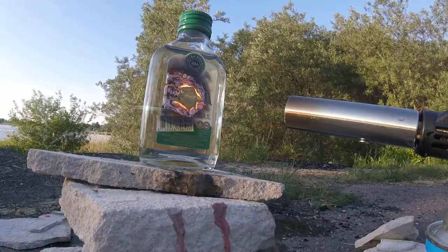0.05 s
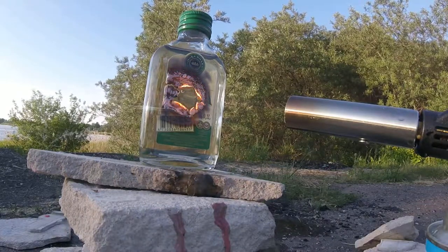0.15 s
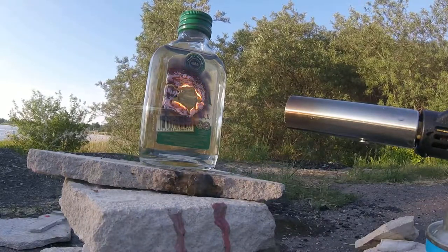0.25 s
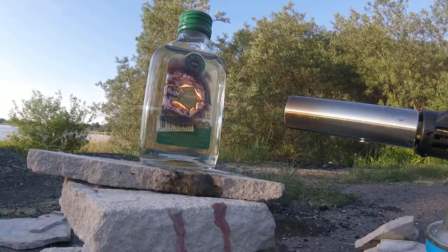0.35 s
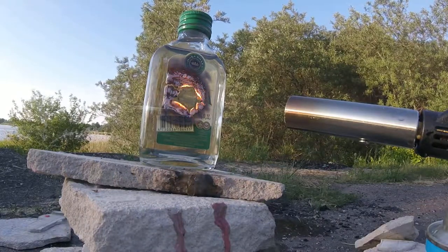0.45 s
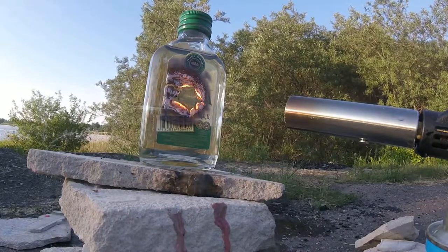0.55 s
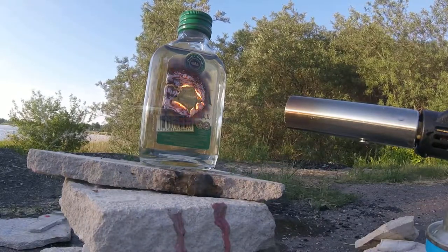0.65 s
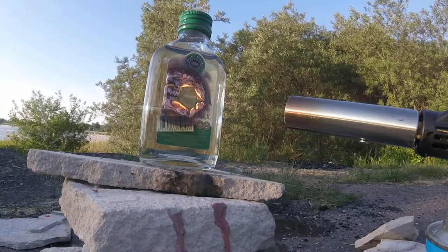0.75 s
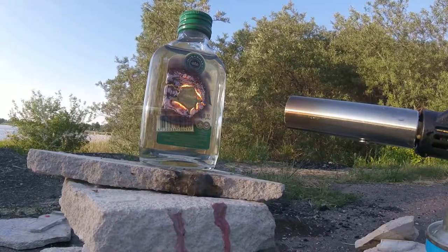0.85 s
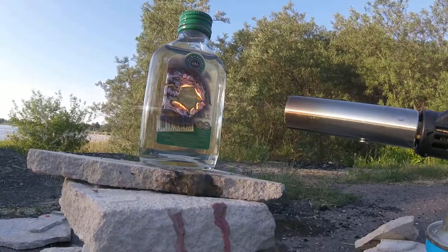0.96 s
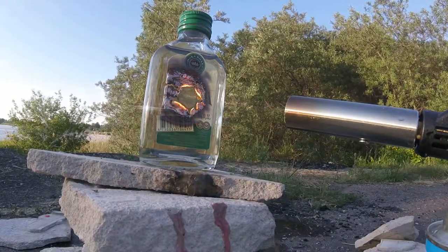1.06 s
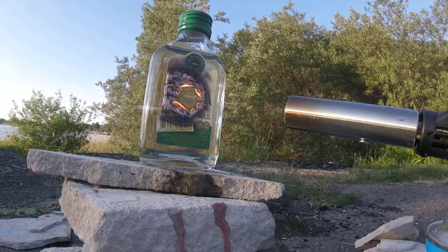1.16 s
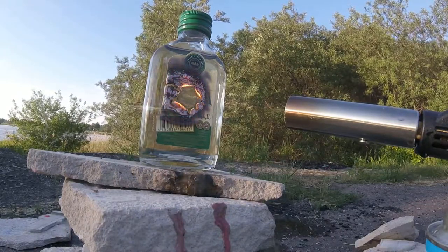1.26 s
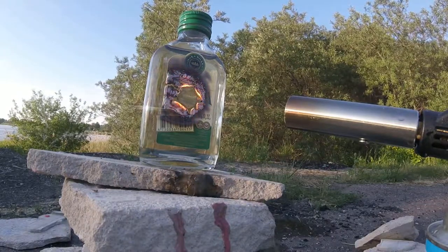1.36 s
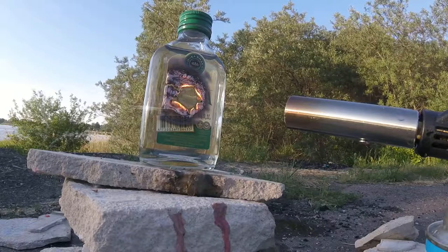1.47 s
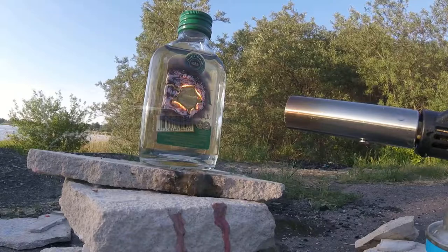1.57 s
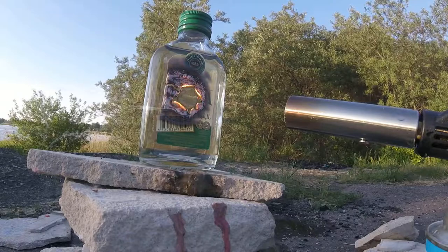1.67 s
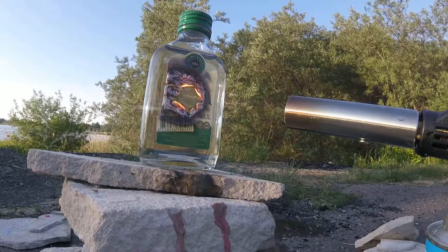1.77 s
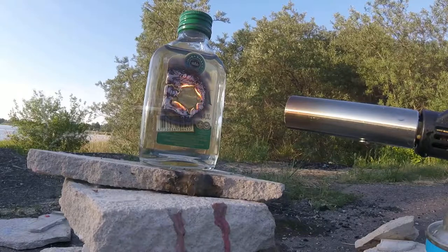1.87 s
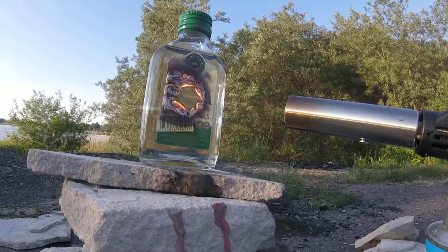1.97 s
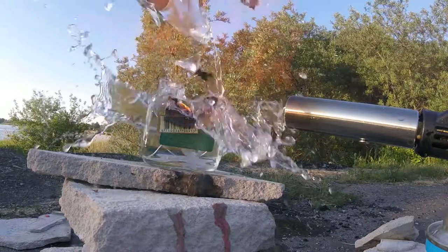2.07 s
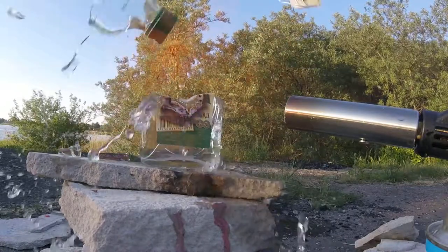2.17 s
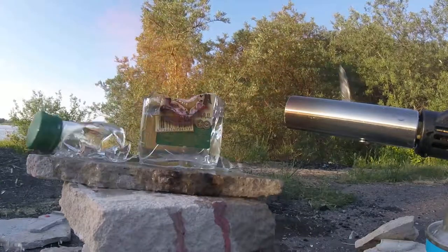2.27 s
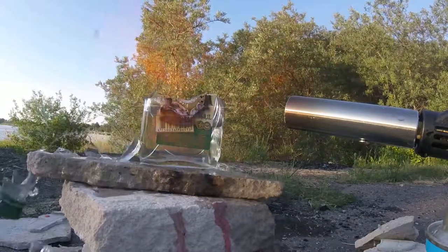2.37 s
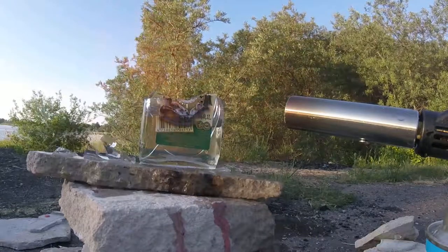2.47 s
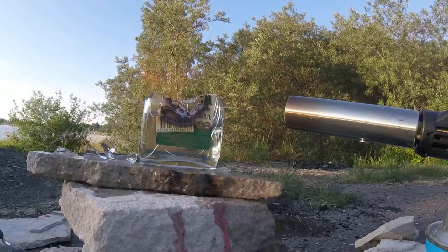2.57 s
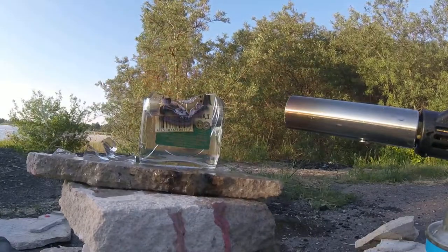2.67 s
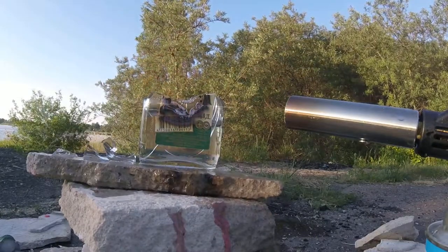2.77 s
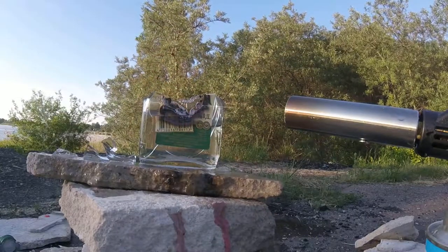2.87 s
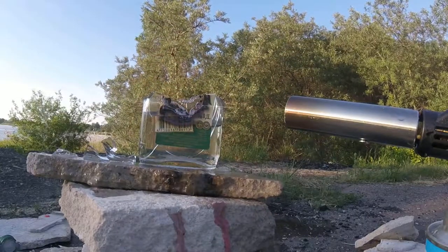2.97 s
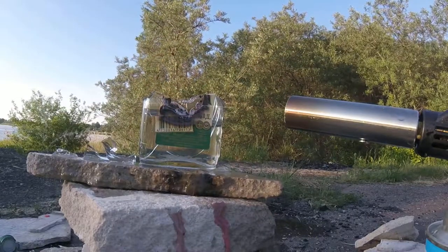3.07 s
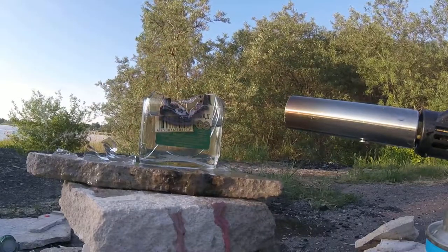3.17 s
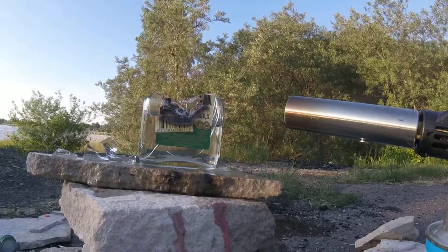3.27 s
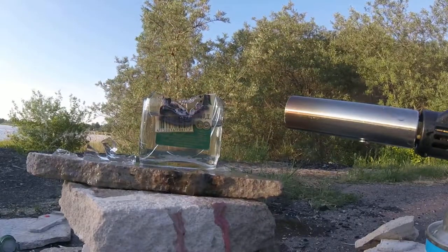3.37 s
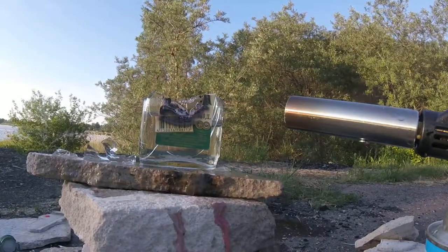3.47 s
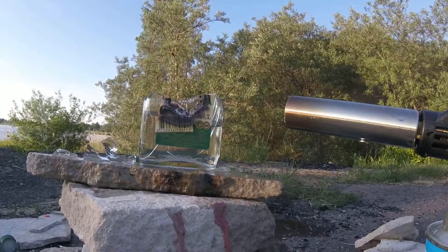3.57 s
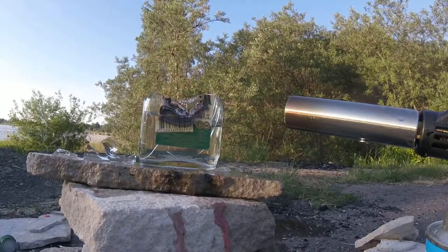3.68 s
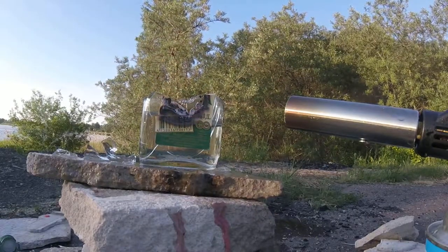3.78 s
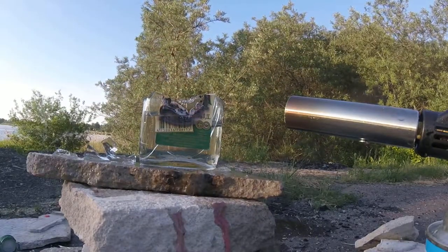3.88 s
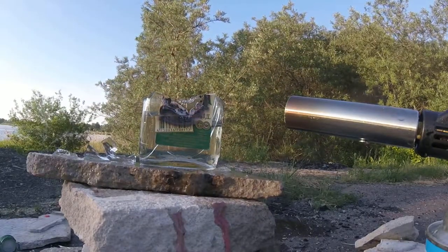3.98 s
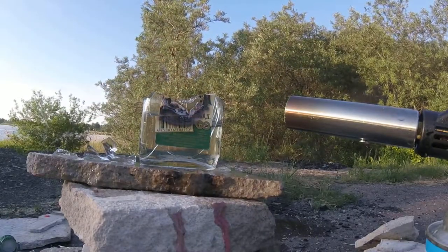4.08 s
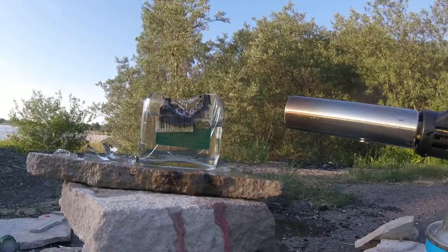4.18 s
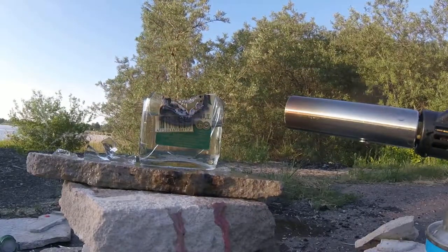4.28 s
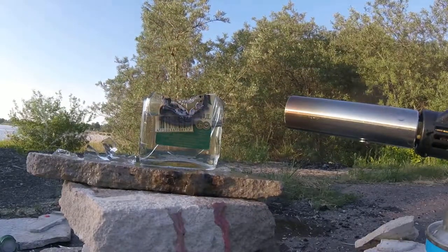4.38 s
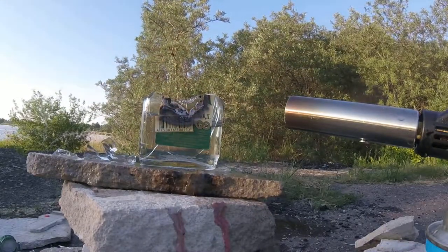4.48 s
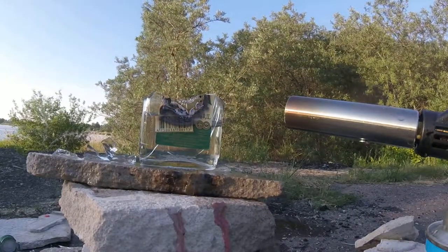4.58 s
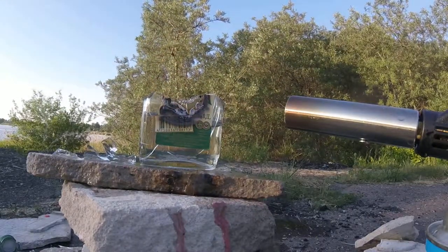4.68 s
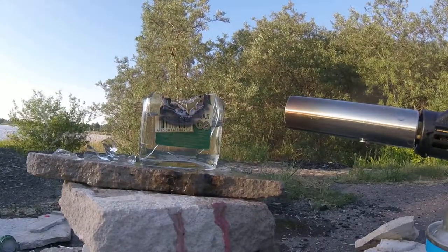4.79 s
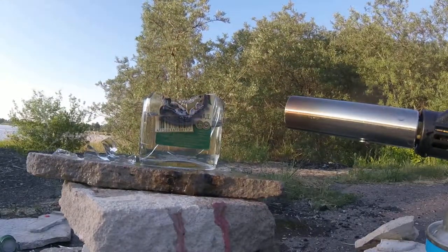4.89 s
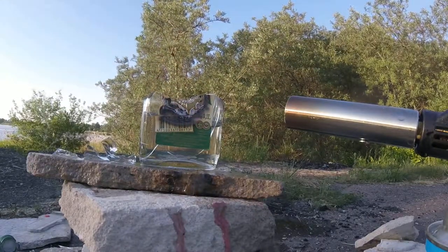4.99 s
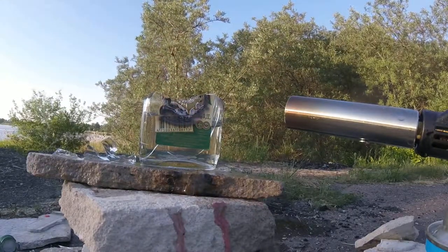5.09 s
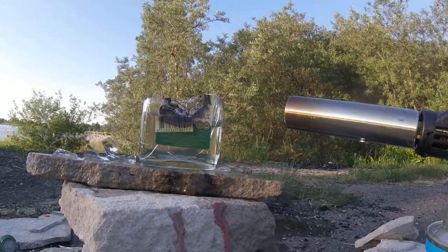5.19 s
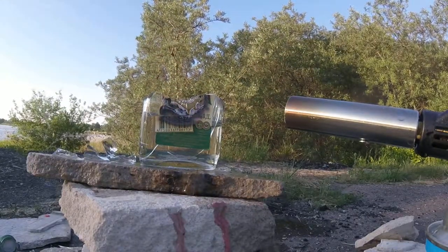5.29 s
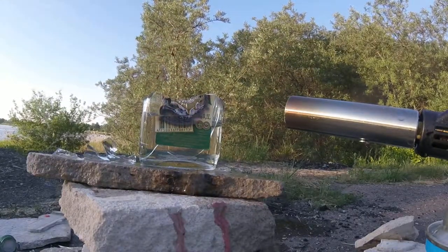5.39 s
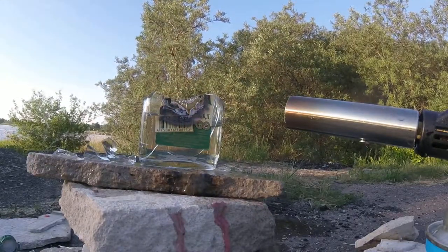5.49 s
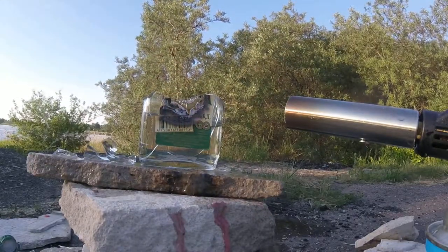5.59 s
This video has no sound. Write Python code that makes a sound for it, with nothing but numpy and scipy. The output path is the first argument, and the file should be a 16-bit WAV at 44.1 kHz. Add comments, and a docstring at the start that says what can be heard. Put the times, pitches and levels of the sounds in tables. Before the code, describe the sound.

Loud, rough torch blast on glass, a split-second hush, a loud pop, clinking falling glass, then soft flame puffs over steady hiss.

```python
"""A gas torch roars against a glass bottle on a stone slab outdoors: turbulent noise shaped in frequency,
with jet hiss coloured by burner tube and bottle. The sound drops abruptly, the bottle bursts as an N-shaped
pressure wave, and its shards ring as damped modes while crumbs, drips and splinters tick on the stone.
The freed flame flutters in puffs of low noise under the hiss of the nozzle."""
import sys
import numpy as np
from scipy import signal
from scipy.fft import rfft, irfft, next_fast_len
from scipy.io import wavfile
from scipy.ndimage import uniform_filter1d, map_coordinates

SR = 44100
rng = np.random.default_rng(int(sys.argv[2]) if len(sys.argv) > 2 else 0)


def store_wav(level_fs):
    """Save 16-bit WAV to argv[1]."""
    pcm = np.round(np.clip(np.atleast_2d(level_fs), -1, 1) * 32767)
    wavfile.write(sys.argv[1], SR, pcm.T.astype(np.int16))


def ratio(d):
    """dB to gain"""
    e = np.asarray(d, float) / 20
    return 10 ** e


N = 248722  # length [samples]
DROP_S = 2.0225  # the whole sound drops abruptly here

# Spectrum of the roar on the glass: (frequency [Hz], relative density [dB per Hz])
ROAR = [(70, -12), (120, -6), (270, 0.5), (450, -1), (1260, -3.5), (1890, -12), (2480, -24.5),
        (3200, -22.5), (4210, -22.5), (6010, -20.5), (8000, -22.5), (11000, -30), (13000, -56)]
# Spectrum of the freed flame's puffs: (frequency [Hz], relative density [dB per Hz])
PUFF = [(150, 2), (300, 0), (700, -7.5), (1500, -15), (3000, -22.5), (5000, -28), (8000, -99)]
# Spectrum of the low flutter: (frequency [Hz], relative density [dB per Hz])
RUMBLE = [(12, -39.5), (20, -3), (59, -2.5), (147, -4.5), (195, -11), (299, -14), (600, -41.5), (780, -58),
          (1320, -120)]
# Harsh upper part of the roar: (frequency [Hz], relative density [dB per Hz])
RASP = [(1000, -12), (1600, -2.5), (2500, 1.5), (3300, -8.5), (4500, -25), (7000, -40)]
# Spectrum of the jet hiss ahead of the tube: (frequency [Hz], relative density [dB per Hz])
HISS = [(300, -38), (800, -10), (1500, -14.5), (3500, -16), (3950, -11), (4350, -1), (6300, -5.5),
        (6900, -4), (7500, -8.5), (9500, -20.5), (12000, -15.5), (14300, 0)]
# Burner tube resonances on the hiss: (frequency [Hz], width [Hz], peak gain added to unity [dB])
TUBE = [(2320, 360, 15.5), (5020, 790, 7), (5960, 230, 4), (9260, 1410, 27), (10900, 400, 13),
        (13060, 380, 20)]
# The whole bottle reflects the hiss and colours it: (frequency [Hz], gain [dB])
BOTTLE = [(300, -16), (3600, 18), (4450, -3.5), (5250, 5.5), (5700, 4.5), (6300, -6), (8000, 1.5),
          (12000, -5), (14300, -7)]

# Flame on the glass when calm: (roar level [dB], low flutter level [dB], hiss level [dB])
CALM = (-29, -37.5, -41.5)
# After the whole sound drops, until the burst: (roar level [dB], low flutter level [dB], hiss level [dB])
DROPPED = (-47.5, -63, -59.5)
# The flame catches the glass harder: (start [s], length [s], roar above calm [dB])
SURGES = [(-.05, .236, 7.5), (.3, .04, 6), (.5, .055, 5), (.6, .06, 2.5), (.668, .018, 6), (.83, .04, 5.5),
          (.876, .018, 6), (1.048, .425, 8), (1.5, .09, 2.5), (1.635, .035, 8), (1.7, .09, 8),
          (1.81, .08, 8.5), (1.92, .07, 9), (2.008, .03, 5)]
SURGE_EDGE_S = .012
FLUTTER_FOLLOWS, HISS_FOLLOWS, RASP_GROWS = 0.085, 0.12, 1.24  # dB of each per dB of roar
# Freed flame between puffs: (time [s], roar level [dB], low flutter level [dB], hiss level [dB])
FREED = [(2.085, -38, -37, -50), (2.2, -51, -41, -49.5), (2.4, -44.5, -36.5, -50.5),
         (2.9, -49, -39.5, -48.5), (3.3, -53, -42.5, -47.5), (3.55, -59, -46.5, -47.5),
         (3.79, -58.5, -48, -45), (3.87, -50.5, -42.5, -44), (4.25, -56, -43, -44), (4.7, -52, -38, -42.5),
         (5.2, -54.5, -42.5, -42.5), (5.5, -54, -40.5, -42), (5.64, -49, -40, -44)]
# Puffs as the freed flame flaps: (middle [s], length [s], roar level [dB], low flutter level [dB])
PUFFS = [(2.134, 0.097, -39.5, -28.5), (2.269, 0.045, -47, -32.5), (2.332, 0.17, -42, -36),
         (2.419, 0.052, -49, -29.5), (2.848, .1, -54, -37), (3.05, 0.065, -46, -33.5),
         (3.273, 0.039, -53, -33), (3.361, 0.039, -51, -37), (3.642, 0.14, -54, -42),
         (3.83, 0.064, -48.5, -33), (4.11, .05, -46, -34), (4.4, .07, -47, -34), (4.527, 0.11, -49, -36.5),
         (4.636, 0.037, -42, -37), (4.684, 0.049, -52, -38), (4.784, 0.037, -60, -35),
         (4.867, 0.069, -34.5, -28), (4.943, 0.069, -45.5, -30), (5.06, 0.079, -37.5, -35),
         (5.285, 0.032, -57, -40), (5.405, 0.086, -45.5, -35), (5.537, 0.14, -44.5, -39)]

# Pressure wave of the burst, one row: (time [s], level [dB], length [s])
BURST = (2.0822, -6.5, .0013)
# Modes that ring in the burst: (frequency [Hz], level [dB], decay by 60 dB [s])
BURST_RING = [(700, -20, .006), (1355, -19.5, 0.011), (4020, -11.5, 0.0066), (5540, -23, .004),
              (8200, -13, 0.0073), (10670, -35, .004), (14180, -51, .003)]
# Modes of each piece of glass: (frequency [Hz], relative level [dB], decay by 60 dB [s])
PIECES = { "sliver": [(2714, -1, 0.19), (5810, -4, 0.14)], "plate": [(1910, -7, 0.067), (2930, -2.5, 0.064),
          (4560, -6.5, 0.018), (5900, -20, 0.028)], "neck": [(547, 7.5, 0.064), (1250, -2, 0.031),
          (3450, -16, .03), (5365, -5, 0.024), (6600, -1, 0.017), (8700, -8.5, .04)],
          "chip": [(3520, -3, 0.046), (6950, 5, 0.035)], "curve": [(1210, 12, 0.025), (2460, 5, 0.042),
          (4220, -7, 0.069), (5450, -19, .06)], "label": [(1870, -5, 0.05), (4460, 1, 0.029),
          (5960, 2.5, 0.032), (6400, -12, 0.025)], "shoulder": [(1210, -6, 0.025), (1750, -0.5, 0.033),
          (2910, 9, 0.022), (3570, 8.5, 0.031), (5400, -30, .02), (6240, -1, 0.026)],
          "base": [(980, -2, .03), (1670, 2, 0.036), (2284, 8.5, 0.029), (3160, 7, 0.033),
          (6350, -30, 0.036)], }
# Landings of each piece: (time [s], relative level [dB], brightness [dB per octave], crack over ring [dB])
LANDINGS = { "sliver": [(2.3805, -28.5, 11, 17), (2.4349, -42, 8, -2), (2.5536, -29, -11, 4),
            (2.7516, -31, -10, -3), (2.7654, -29, 0.5, -4), (2.818, -24, -14, -14), (2.8579, -23, 7, 5),
            (2.9114, -52, 4, -6), (2.9244, -35.5, -8, -3), (2.9744, -46, -10, 10)],
            "plate": [(2.1929, -13.5, 9, -15)], "neck": [(2.2589, -13.5, 3.1, -11), (2.303, -32, 1, -17)],
            "chip": [(2.2897, -32, 9, -13)], "curve": [(2.3131, -24, 3.5, -7.5)],
            "label": [(2.3385, -19.5, -10, -14), (2.3415, -20, 7.5, 8), (2.351, -30, 3, 0),
            (2.358, -19, -3, 0)], "shoulder": [(2.4349, -18, -4.5, -7), (2.4504, -33, -12, -10)],
            "base": [(2.47, -25, -3.7, 9)], }
# Crumbs that tick: (time [s], level [dB], colour [Hz])
TICKS = [(2.171, -29, 2400), (2.175, -24, 7400), (2.328, -20, 3400), (2.333, -16, 3620), (2.333, -17, 6600),
         (2.355, -12, 7500), (2.367, -14, 7160), (2.407, -15, 8000), (2.477, -17.5, 6400),
         (2.557, -17.5, 3450), (2.557, -15, 8000), (2.562, -14, 8200), (2.577, -22, 8000),
         (2.753, -25.5, 3770), (2.851, -12, 7900), (2.859, -27, 3970), (2.918, -17, 7700),
         (2.922, -16, 7700), (3.99, -25, 7450)]
TICK_T60_S = 0.0046
# Spilled liquid drips on the stone: (time [s], level [dB])
DRIPS = [(2.874, -24), (2.91, -36), (2.984, -23), (3.037, -25), (3.055, -30), (3.159, -29), (3.364, -18.5),
         (3.45, -24), (3.485, -21.5), (3.645, -22), (3.753, -29)]
DRIP_HZ, DRIP_T60_S = 2890, 0.00085
# Shower of splinters, least level: (time [s], level [dB])
SHOWER = [(2.09, -48), (2.3, -45), (2.345, -29.5), (2.44, -40), (2.9, -49), (3.801, -53)]
# Echoes off the stones: (delay [s], level [dB])
STONE = [(.0007, -34), (.0017, -25), (.0046, -22.5), (.0083, -31)]
# Response of the microphone port: (frequency [Hz], gain [dB])
MIC = [(10, -0.5), (6400, -0.5), (6950, -12), (8200, -16.5), (9500, -16), (11500, -18.5), (14200, -38),
       (16000, -64)]


def torch():
    """Turbulent noise: burning roars on the glass, then puffs freely; the jet hisses through resonances."""
    t = np.arange(N) / SR
    before_drop = t < DROP_S
    roar_gain, flutter_gain, hiss_gain = flame_levels(t)

    on_glass = rush(lambda hz: gains(ROAR, hz), (300, 1800), patchy_db=0.62, lumpy_db=1.5, rate=90)
    puffs = rush(lambda hz: gains(PUFF, hz), (350, 1400), patchy_db=0.8, lumpy_db=2.54, rate=70)
    roar = np.where(before_drop, on_glass, puffs)

    free_hiss = rush(lambda hz: gains(HISS, hz) * tube_resonances(hz), (4300, 6800),
                     patchy_db=1.3, lumpy_db=0.8, rate=14)
    bottle_hiss = filtered(free_hiss, lambda hz: gains(BOTTLE, hz))
    hiss = np.where(before_drop, bottle_hiss, free_hiss)

    flutter = rush(lambda hz: gains(RUMBLE, hz), (25, 300), patchy_db=1.1, lumpy_db=1.4, rate=25)
    rasp = rush(lambda hz: gains(RASP, hz), (1500, 3300), patchy_db=-0.75, lumpy_db=3.5, rate=270)
    # the rasp grows faster than the roar
    rasp_gain = before_drop * ratio(-39.5) * (roar_gain / ratio(CALM[0])) ** RASP_GROWS
    return rasp_gain * rasp + roar_gain * roar + hiss_gain * hiss + flutter_gain * flutter


def tube_resonances(hz):
    """Resonance: each tube mode adds a Lorentzian peak to a flat response."""
    peaks = [ratio(db) / (1 + ((hz - centre) / (width / 2)) ** 2) for centre, width, db in TUBE]
    return 1 + sum(peaks)


def flame_levels(t):
    """Amplitude modulation: surges on the glass, an abrupt drop, then puffs adding in power to a drift."""
    def edge(since):
        return np.clip(since / SURGE_EDGE_S + .5, 0, 1)

    surge_db = 0.26 * wobble(39.37)
    for start, length, db in SURGES:
        surge_db = surge_db + db * edge(t - start) * edge(start + length - t)
    pressed = ratio(np.outer([1, FLUTTER_FOLLOWS, HISS_FOLLOWS], surge_db) + np.c_[CALM].T)

    s, *levels = np.transpose(FREED)
    power = ratio([np.interp(t, s, level) for level in levels]) ** 2
    for middle, length, *puff_db in PUFFS:
        swell = np.cos(np.pi * np.clip((t - middle) / length, -.5, .5)) ** 2
        power[:2] += (ratio(puff_db)[:, None] * swell) ** 2  # roar and flutter only

    after_drop = np.where(t < BURST[0], ratio(DROPPED)[:, None], np.sqrt(power))
    return np.where(t < DROP_S, pressed, after_drop)


def burst():
    """Shock radiation: released vapour makes an N-shaped pressure wave; the parting glass rings briefly."""
    s, db, length = BURST
    track, t = np.zeros(N), np.arange(SR // 20) / SR
    wave = np.where(t < length, 1 - 2.0 * t / length, 0)
    rounded = np.convolve(wave, unit(np.hanning(9)) / 6.4)[:len(t)]
    noise = ratio(-14.5 - 60 * t / 0.0043) * rng.standard_normal(len(t))
    spray = np.convolve(noise, [.4, .7, .4])[:len(t)]
    add(track, s, ratio(db) * rounded + ring(BURST_RING, t, 0) + spray)
    return track


def shards():
    """Modal impact: each landing cracks and rings its piece; crumbs and drips are single short modes."""
    track, t = np.zeros(N), np.arange(SR // 4) / SR
    for piece, rows in LANDINGS.items():
        stops = [row[0] for row in rows[1:]] + [np.inf]  # the next contact damps the old ring
        for (s, db, tilt_db, crack_db), stop in zip(rows, stops):
            # the piece rattles against the stone for a few ms, roughening its ring
            rattle = unit(uniform_filter1d(rng.standard_normal(len(t)), size=40))
            chatter = 1 + 0.74 * rattle * np.exp(-t / 0.004)
            onset = 1 - np.exp(-t / 0.00062)
            ringing = ring(PIECES[piece], t, tilt_db) * chatter * (s + t < stop) * onset
            noise = np.convolve(rng.standard_normal(len(t)), [.7, .3, -.6])[:len(t)]
            crack = noise * ratio(crack_db - 60 * t / 0.008)
            add(track, s, ratio(db - 8.0) * (ringing + crack))

    soft_onset = 1 - np.exp(-t / 0.00006)
    crumbs = [(s, hz, db, TICK_T60_S) for s, db, hz in TICKS]
    drips = [(s, DRIP_HZ, db, DRIP_T60_S) for s, db in DRIPS]
    for s, *mode in crumbs + drips:
        add(track, s, ring([mode], t, 0) * soft_onset)
    return track


def splinters(count=1200):
    """Random superposition: many tiny pieces land by chance, each a few damped cycles."""
    s, db = np.transpose(SHOWER)
    when, pitch, size, life = rng.random((count, 4)).T
    when = s[0] + (s[-1] - s[0]) * when ** 1.6  # denser early on
    hz = 1800 * 4.5 ** pitch
    t60 = (2.0 + 22 * life ** 2) / hz  # 2 to 24 cycles
    level_db = np.interp(when, s, db) + 9 * size ** 3
    t = np.arange(400) / SR
    decay = ratio(level_db[:, None] - 60 * t / t60[:, None])
    grains = decay * np.sin(2 * np.pi * hz[:, None] * t)
    at = np.round(when * SR).astype(int)[:, None] + np.arange(len(t))
    return np.bincount(at.ravel(), grains.ravel(), N)[:N]


def stone_echoes(glass):
    """Specular reflection: the stones return delayed, weaker copies of the glass sounds."""
    return sum(ratio(db) * np.roll(glass, round(delay * SR)) for delay, db in STONE)


def rush(response, band, patchy_db, lumpy_db, rate):
    """Turbulence as noise uneven in time and frequency, shaped by a response, with rms 1 in the band [Hz]."""
    lumpy = rng.standard_normal(N) * ratio(lumpy_db * wobble(rate))
    z = signal.stft(lumpy, nperseg=512)[2]
    field = uniform_filter1d(rng.standard_normal(z.shape), size=8, axis=0)
    field = uniform_filter1d(field, size=8, axis=1)
    patchy = signal.istft(z * ratio(patchy_db * unit(field)), nperseg=512)[1][:N]
    x = filtered(patchy, response)
    return x / np.std(filtered(x, lambda hz: (hz > band[0]) & (hz < band[1])))


def ring(modes, t, tilt_db):
    """Modal superposition: exponentially damped sines, tilted in dB per octave about 3 kHz."""
    total = 0
    for hz, db, t60 in modes:
        decay = ratio(db + tilt_db * np.log2(hz / 3000) - 60 * t / t60)
        total = total + decay * np.sin(2 * np.pi * hz * t)
    return total


def wobble(rate):
    """Slow random modulation: a smooth curve through random knots, rate of them a second."""
    knots = rng.standard_normal(int(N * rate / SR) + 4)
    return map_coordinates(knots, [np.arange(N) * rate / SR])


def filtered(x, response):
    """Linear filtering: the spectrum of x times a response of frequency."""
    m = next_fast_len(N + 8192)
    return irfft(rfft(x, m) * response(np.fft.rfftfreq(m, 1 / SR)), m)[:N]


def gains(points, hz):
    """Frequency response: (Hz, dB) points joined on a log axis, -120 dB outside."""
    f, db = np.transpose(points)
    return ratio(np.interp(np.log(hz + 1), np.log(f + 1), db, left=-120, right=-120))


def unit(x):
    """Normalisation by mean power: scale to rms 1."""
    return x / np.sqrt(np.mean(x ** 2) + 1e-20)


def add(track, s, sound):
    """Linear superposition: mix a sound into the track at s seconds."""
    track[round(s * SR):][:len(sound)] += sound


def scene():
    """Superposition of torch and glass, the glass with short echoes off the stones."""
    glass = shards() + burst() + splinters()
    return (torch() + glass + stone_echoes(glass))[None]


def low_pass(x):
    """Removes everything above the highest recorded frequency."""
    return signal.sosfilt(signal.butter(12, 14255, fs=SR, output="sos"), x)


def record(dry):
    """Low-pass response of the microphone port: the treble is lost."""
    heard = filtered(dry[0], lambda hz: gains(MIC, hz))
    return low_pass(heard[None])


dry = scene()
out = record(dry)
store_wav(out)
```